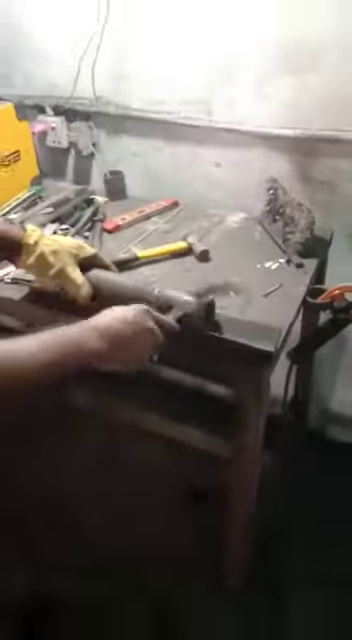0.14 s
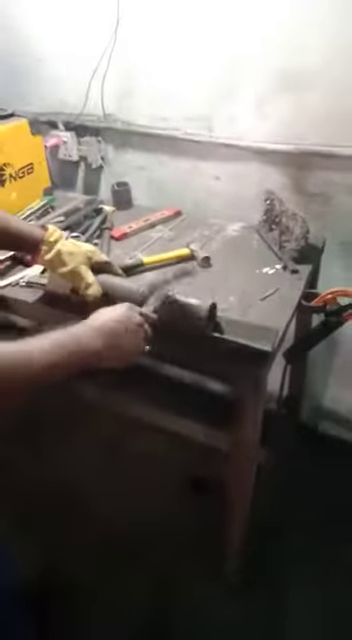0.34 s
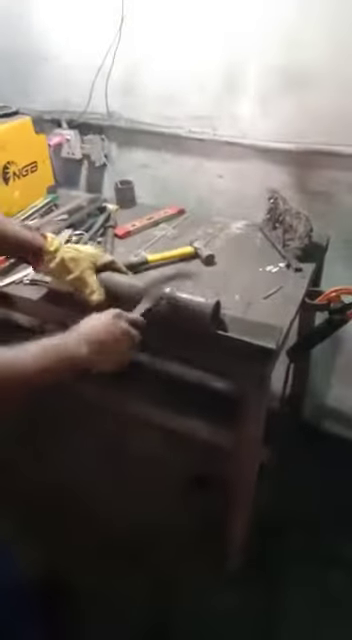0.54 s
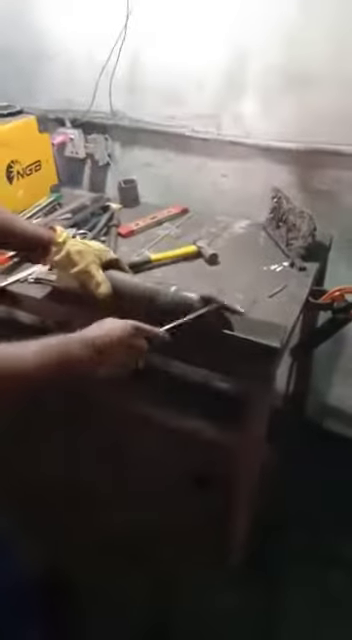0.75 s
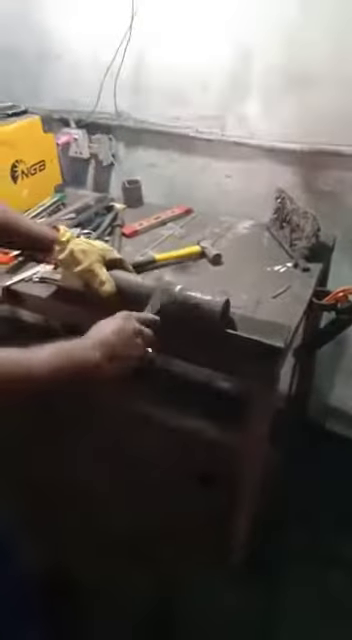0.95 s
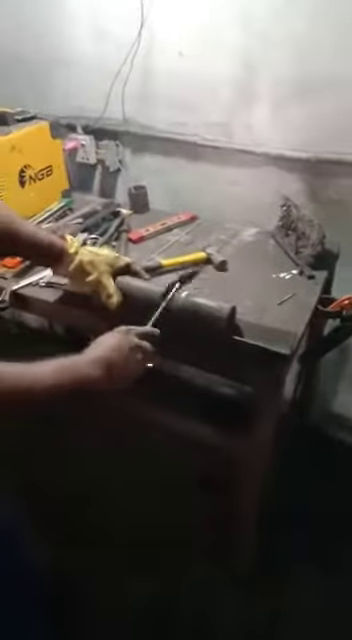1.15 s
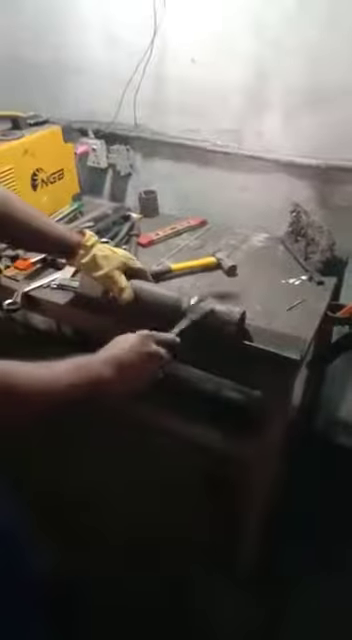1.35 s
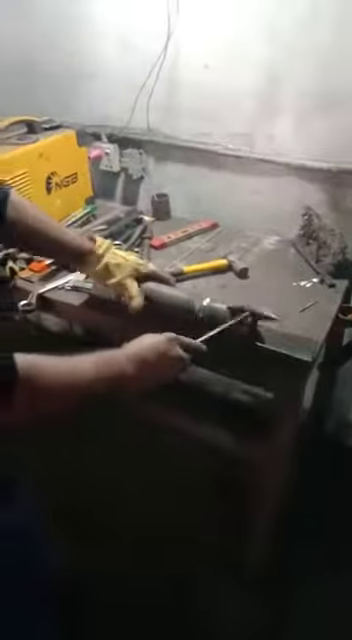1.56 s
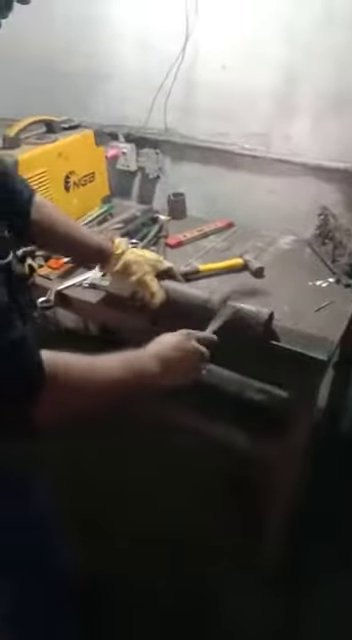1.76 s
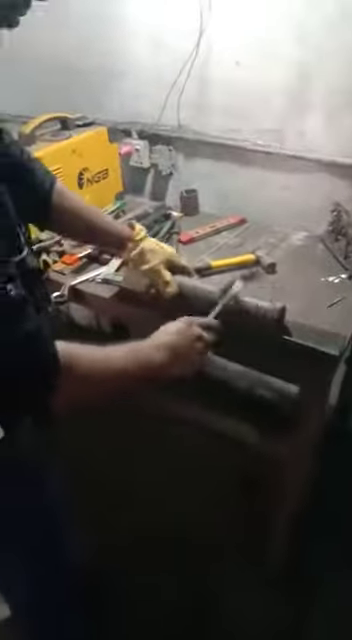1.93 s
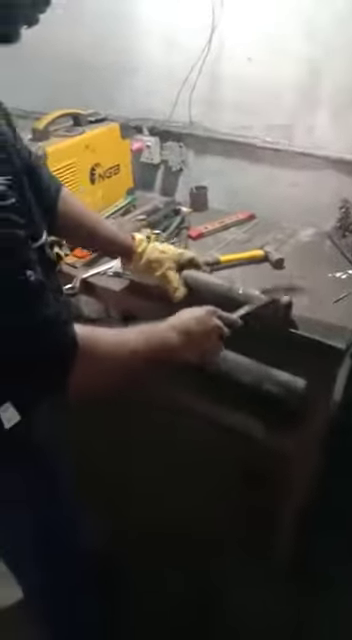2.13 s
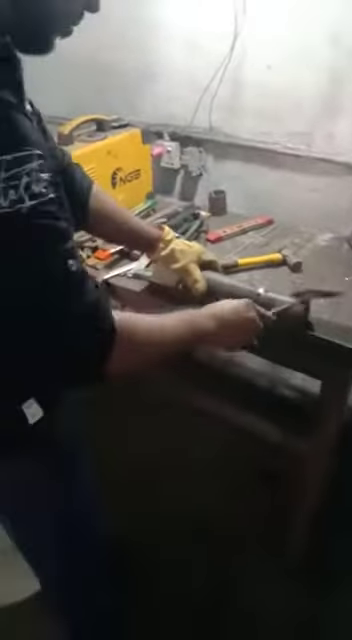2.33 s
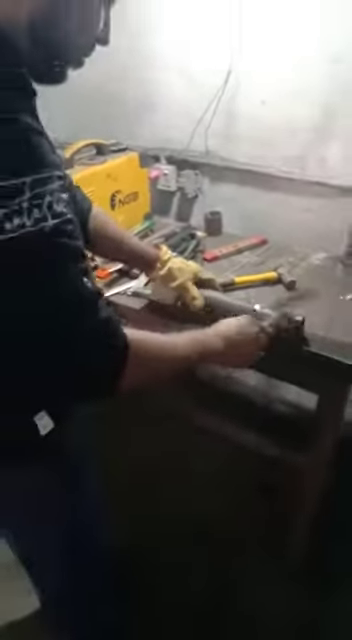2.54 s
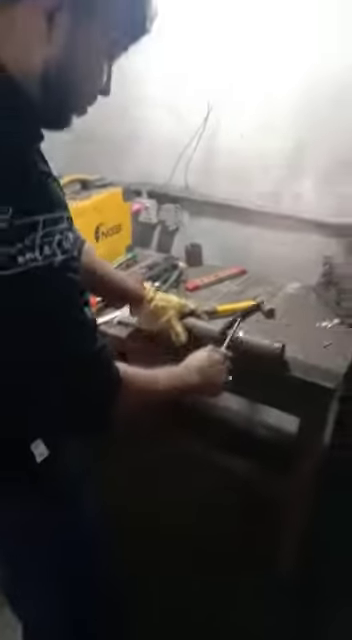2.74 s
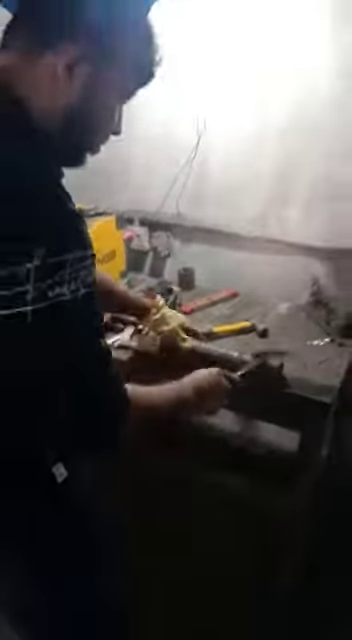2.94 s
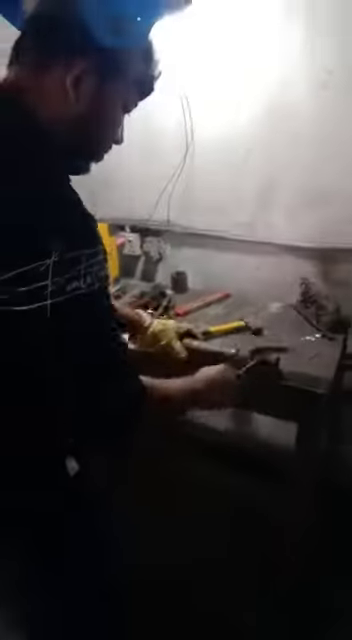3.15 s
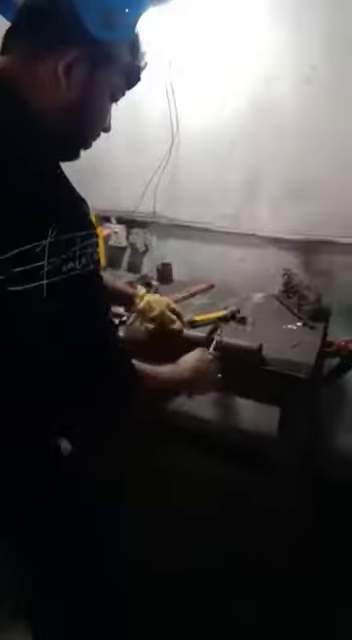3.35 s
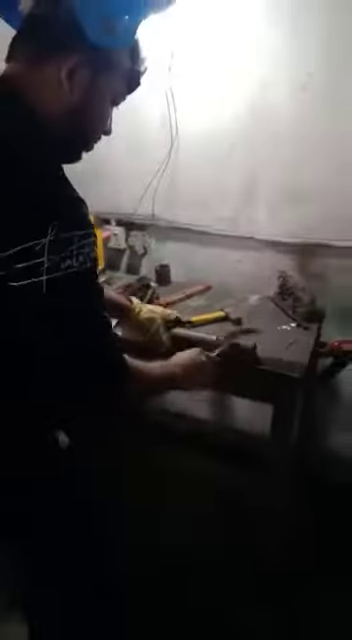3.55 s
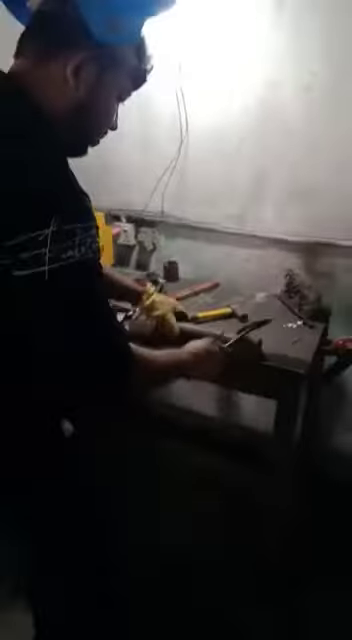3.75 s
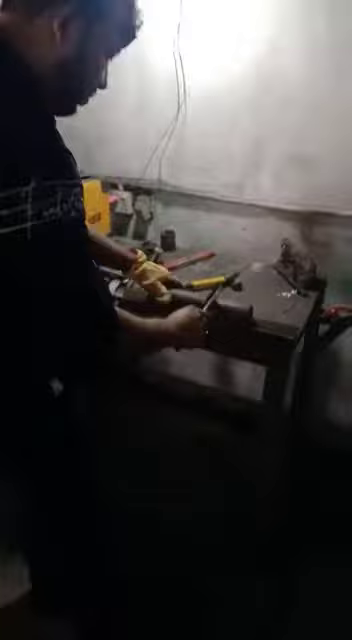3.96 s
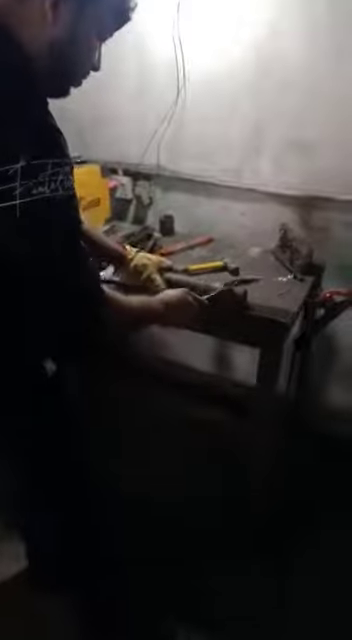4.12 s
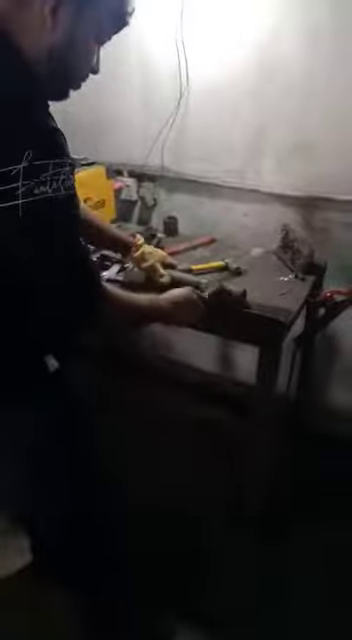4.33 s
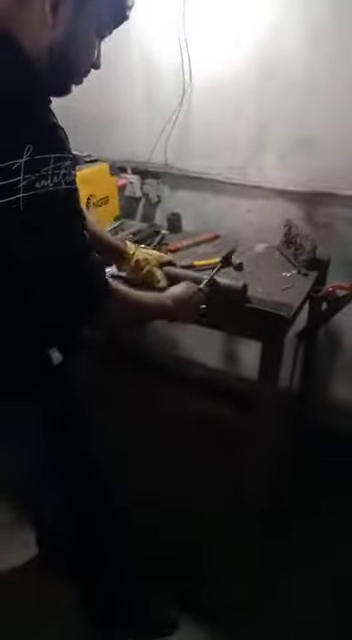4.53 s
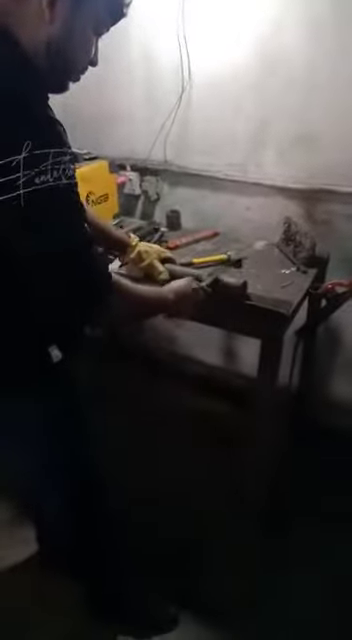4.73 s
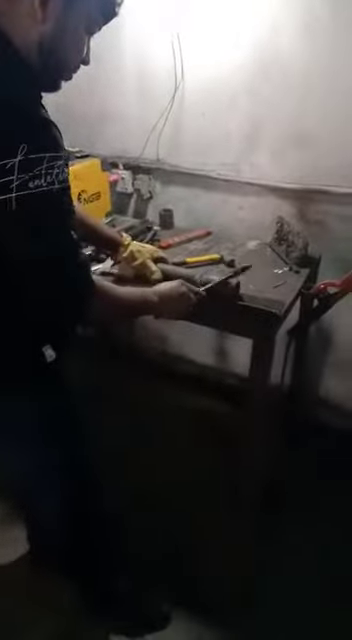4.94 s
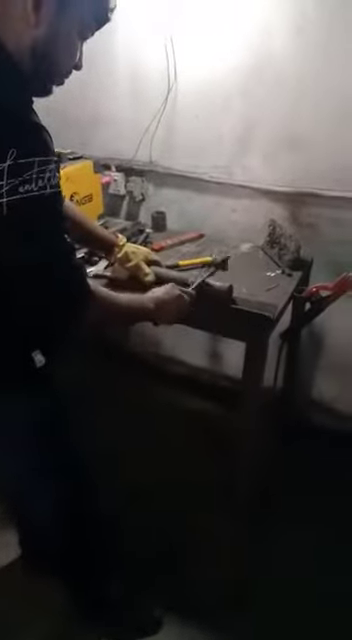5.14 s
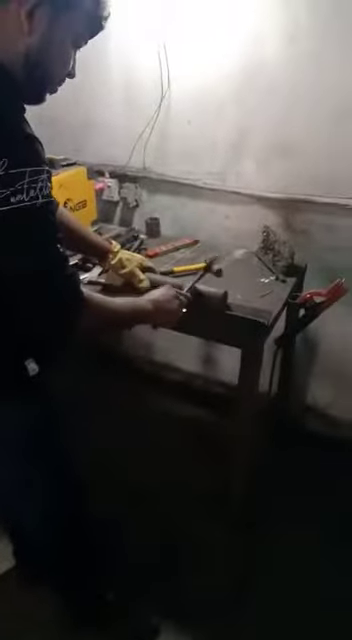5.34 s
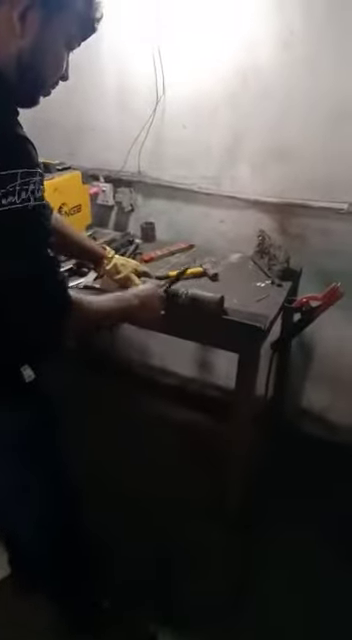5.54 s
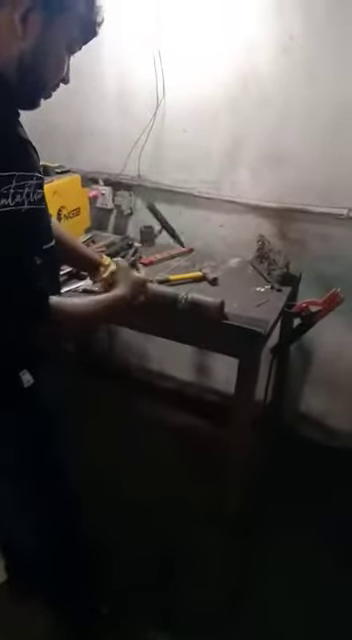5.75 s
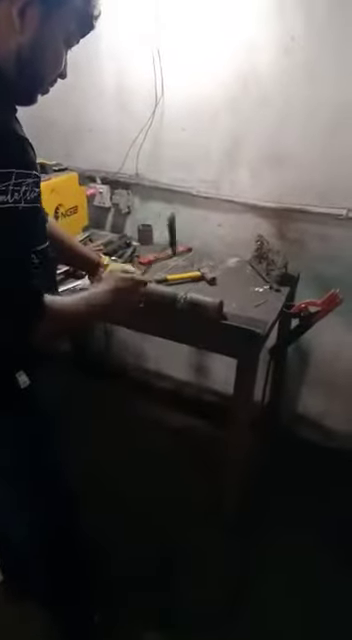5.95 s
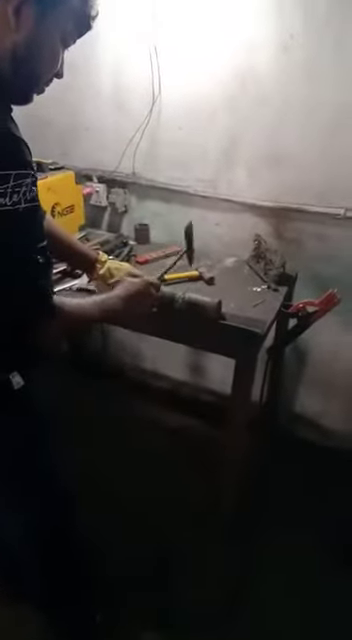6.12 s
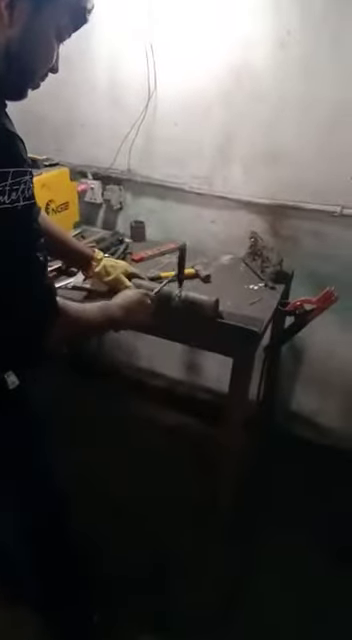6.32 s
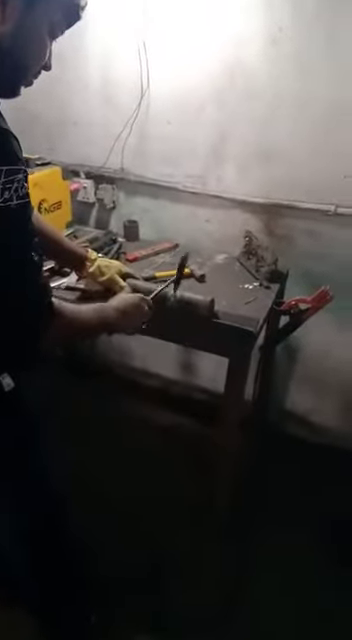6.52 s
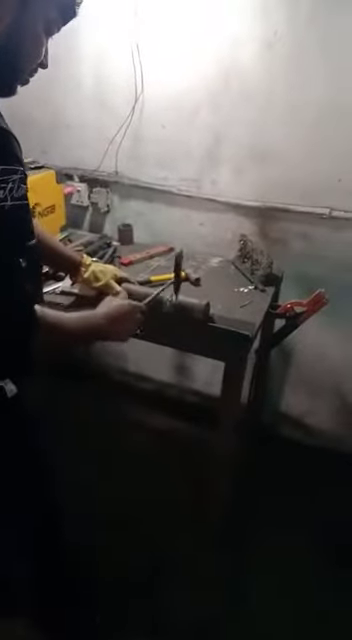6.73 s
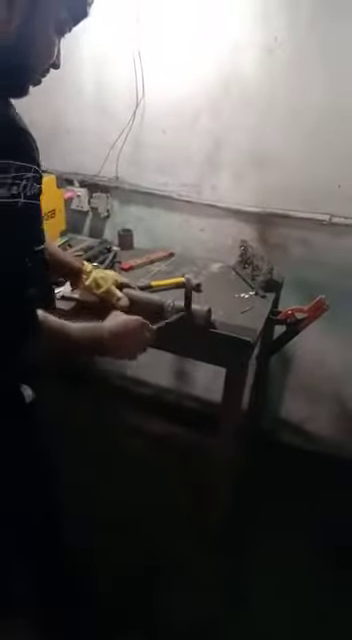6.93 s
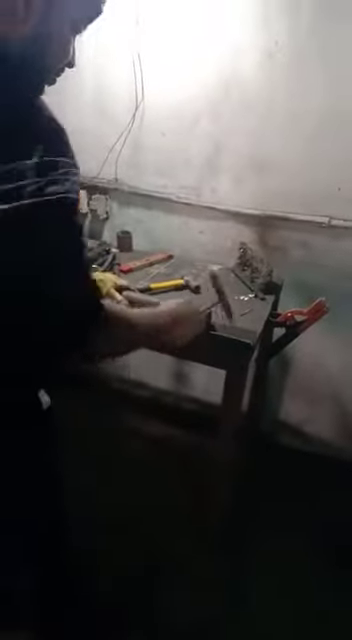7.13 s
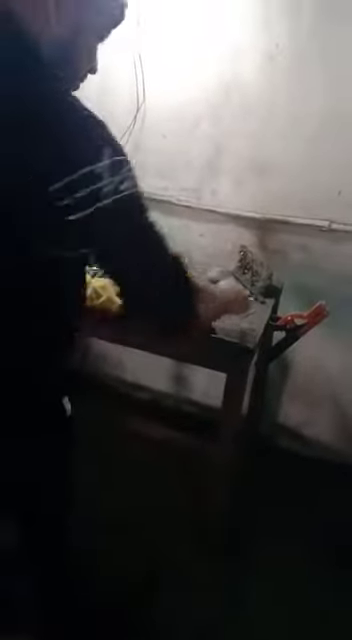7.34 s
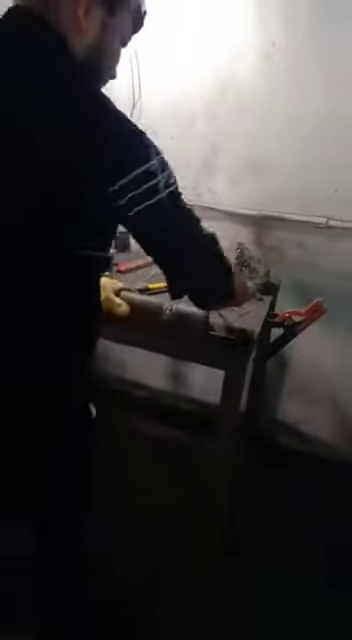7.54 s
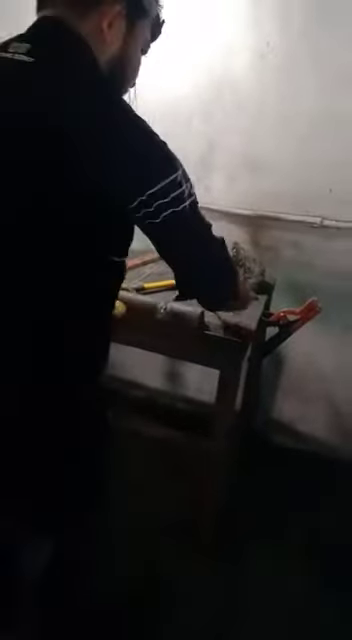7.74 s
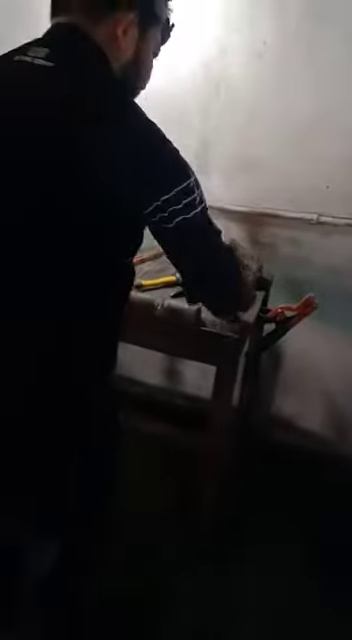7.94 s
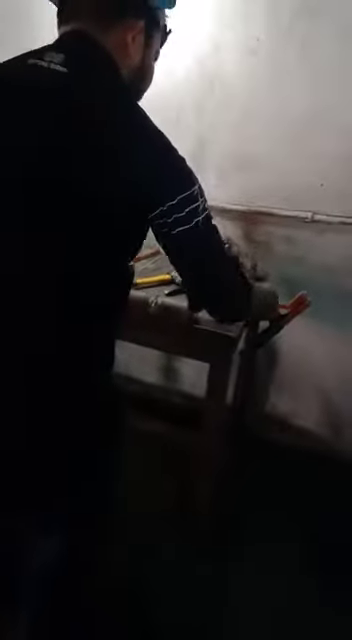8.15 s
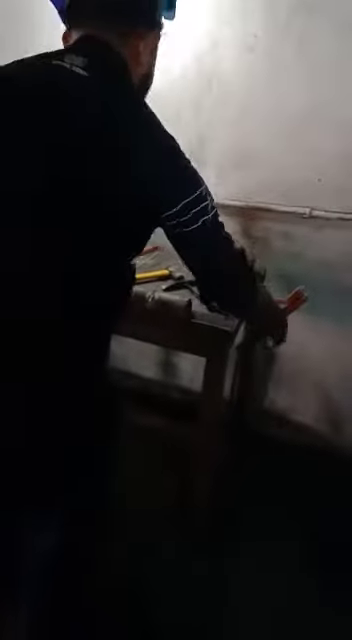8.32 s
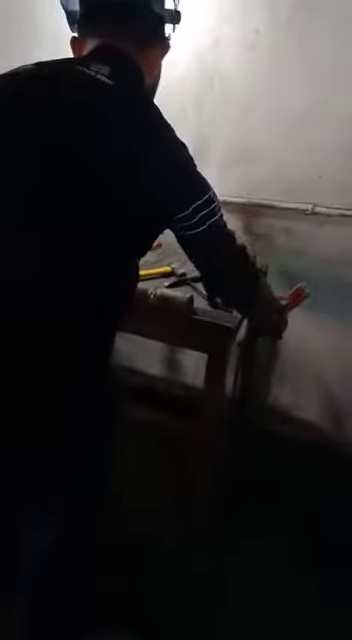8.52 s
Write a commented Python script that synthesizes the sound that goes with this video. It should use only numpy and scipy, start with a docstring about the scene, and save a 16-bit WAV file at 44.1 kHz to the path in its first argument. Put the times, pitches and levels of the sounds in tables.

```python
"""Chipping slag off a pipe weld

A chipping hammer pecks slag off the weld on a steel pipe that lies on a steel bench, in a bare workshop.
On slag a blow crunches (bursts of noise) and jolts pipe and bench; on bare steel it rings (tuned resonances).
Three later blows follow a pause, then the hammer slides across the bench and clatters down.
A phone hears it through the hard room (noise that dies away as echo), over a steady hiss."""
import sys
import numpy as np
from scipy import signal
from scipy.fft import rfft, irfft
from scipy.io import wavfile

SR = 44100
rng = np.random.default_rng(int(sys.argv[2]) if len(sys.argv) > 2 else 0)


def transcribe(u):
    """Save the signal u as a 16-bit wav file named by the first command-line argument.

    u: samples, shape (n,) or (channels, n), limited to [-1, 1]; the rate is SR.
    q: integer samples, one column per channel.
    """
    v = np.clip(np.atleast_2d(u).T, -1, 1)
    q = np.round(v * 32767).astype(np.int16)
    wavfile.write(sys.argv[1], SR, q)


N = 382788
BLOW_S = 0.05  # a burst's level is its energy spread over this time


def undb(db):
    """Turn decibels into gain."""
    return 10 ** (np.asarray(db) / 20)


def seconds(length):
    """Make a time axis in seconds."""
    return np.arange(int(length * SR)) / SR


def unit(x):
    """Scale a sound so that its energy is 1."""
    return x / np.sqrt(np.sum(x ** 2) + 1e-18)


def burst(x, db):
    """Give a short sound the energy of BLOW_S seconds at that level."""
    return unit(x) * np.sqrt(BLOW_S * SR) * undb(db)


def add(out, s, x):
    """Mix x into out from time s."""
    i = int(s * SR)
    out[i:i + len(x)] += x[:N - i]


def cut(x, hz, kind, order=2):
    """Keep the lows ("low") or the highs ("high")."""
    return signal.sosfilt(signal.butter(order, hz, kind, fs=SR, output="sos"), x)


def resonate(x, hz, width_hz):
    """Pass x through one resonance, with gain 1 at its centre."""
    return signal.lfilter(*signal.iirpeak(hz, hz / width_hz, fs=SR), x)


def resonate_twice(x, hz, width_hz):
    """Two equal resonances in a row keep less of the sound on either side."""
    return resonate(resonate(x, hz, width_hz), hz, width_hz)


def resonances(push, modes, detune=0.0053, scatter_db=4.0):
    """Drive (hz, t60_s, db) modes; grip and contact point shift each a little from blow to blow."""
    total = 0
    for hz, t60, db in modes:
        pitch_chance, level_chance = rng.standard_normal(2)
        width_hz = np.log(1000) / (np.pi * t60)  # a narrower resonance rings longer
        tone = resonate(push, hz * (1 + detune * pitch_chance), width_hz)
        total = total + burst(tone, db + scatter_db * level_chance)
    return total


def colour(x, points, size=4096):
    """Filter x through (hz, db) points, with a response that never starts before its input."""
    hz, db = np.transpose(points)
    bins_hz = np.fft.rfftfreq(size, 1 / SR)
    gain = undb(np.interp(np.log(bins_hz + 1), np.log(hz), db))
    # folding the cepstrum (the spectrum of the log gain) puts the response after time 0
    cepstrum = irfft(np.log(gain))
    cepstrum[1:size // 2] *= 2
    cepstrum[size // 2 + 1:] = 0
    response = irfft(np.exp(rfft(cepstrum)))
    return signal.fftconvolve(x, response)[:len(x)]


def fade(t, t60):
    """A smooth decay that falls 60 dB in t60 seconds."""
    return np.exp(-np.log(1000) * t / t60)


def hiss(db=-36.0):
    """Broad steady hiss: random noise with a gently shaped spectrum."""
    # colour of the hiss: pitch_hz [Hz], gain_db [dB]
    hiss_curve = [(50, 10), (200, 0), (700, 0.5), (2000, -0.5), (4500, 3), (7500, 1.5), (10000, -0.5),
                  (15000, -2.5)]
    return colour(rng.standard_normal(N), hiss_curve) * undb(db)


def contact(t, chatter, grit_db):
    """The chisel tip chatters through brittle slag: a swell of tiny uneven fractures."""
    grain = 16  # samples that share one random loudness
    loudness = undb(grit_db * rng.standard_normal(len(t) // grain + 1))
    grains = np.repeat(loudness, grain)[:len(t)]
    return t * np.exp(-t / chatter) * grains * rng.standard_normal(len(t))


def crunch(chatter, db, grit_db=2.5, tick_db=-17, tick_t60=0.004, clean_hit=0.013, top_hz=11000):
    """Slag breaks in a swell of noise; a sharp tick of steel on steel is weaker when the chatter is long."""
    t = seconds(0.15)
    tick = burst(fade(t, tick_t60) * rng.standard_normal(len(t)), db + tick_db)
    tick = tick * min(1, clean_hit / chatter) ** 2  # thick slag muffles the tick
    slag = burst(contact(t, chatter, grit_db), db)
    slag = cut(slag, top_hz, "low", order=1)
    return cut(slag + tick, 507, "high")


def ring(spot, chatter, ring_db, clank_db, build=1.18, steel_db=-3):
    """The chatter drives the steel; the strike spot sets the share of each bright mode."""
    # bright modes of pipe and hammer: pitch_hz [Hz], t60_s [s], then level_db at spots 0, 1, 2, 3 [dB]
    steel = [(2353, 0.097, -17.5, -2, -9.5, -23), (2794, 0.075, -19, -9.5, -3, -6.5),
             (2875, 0.16, -7.5, -7.5, -12, -4.5), (3003, 0.12, -19.5, -8, -20, -29),
             (3455, 0.057, -15.5, -10.5, -8, -7.5), (3620, 0.11, -9, -26, -26, -16),
             (3815, 0.12, -22, -19, -6, -15), (4370, 0.046, -34, -17, -3.5, -13),
             (4450, 0.085, -17, -19, -13, -11), (5380, 0.14, -14, -7, -23, -16),
             (5596, 0.046, -11, -9.5, -7, -10), (6350, 0.12, -87, -16, -24, -25),
             (7070, 0.098, -16, -19.5, -5.5, -22), (7130, 0.06, -20, -7.5, -10.5, -11),
             (7650, 0.17, -7, -17, -9.5, -12), (8440, 0.077, -4.5, -4.5, -0.5, -6),
             (9150, 0.075, -8.5, -12, -6, -8.5), (11650, 0.075, -3.5, -6, -0.5, -2.5),
             (12300, 0.1, -10, -15, -37, -25), (14500, 0.091, -5, -11, -14, -12),
             (15450, 0.1, -20, -20, -21, -20)]
    # lowest wall modes of the pipe, a short clank: pitch_hz [Hz], t60_s [s], level_db [dB]
    wall = [(1198, 0.056, -8.5), (1290, 0.044, -5), (1374, 0.024, -8)]
    push = contact(seconds(0.25), build * chatter, grit_db=3)
    bright = [(hz, t60, ring_db + steel_db + spot_db[spot]) for hz, t60, *spot_db in steel]
    clank = [(hz, t60, clank_db + db) for hz, t60, db in wall]
    return resonances(push, bright + clank)


def stray(chatter, ring_db, count=7, tilt_db=5.0):
    """The pipe has many more modes; each contact picks a few pings, stronger by tilt_db per octave upwards."""
    low_hz, high_hz = 3022, 14250
    t60_s, top_db = 0.078, -9.5  # top_db: level at high_hz, relative to the ring
    push = contact(seconds(0.25), chatter, grit_db=3)
    pitches = low_hz + (high_hz - low_hz) * rng.random(count)
    levels = ring_db + top_db + tilt_db * np.log2(pitches / high_hz)
    return resonances(push, [(hz, t60_s, db) for hz, db in zip(pitches, levels)])


def mode(t, hz, t60, rise, db):
    """A pure tone that builds up while the contact lasts, then dies away."""
    swell = (1 - np.exp(-t / rise)) * fade(t, t60)
    return burst(swell * np.sin(2 * np.pi * (hz * t + rng.random())), db)


def thump(chatter, db, knock_db=-2, modes_db=-29, rattle=0.0028,
          boom_hz=130, boom_width_hz=45, boom_db=-23, boom_spread=0.16):
    """The pipe jolts the bench: a dull knock drawn out by loose tools, a boom of the frame, a few low modes."""
    # modes of the bench: pitch_hz before a random shift [Hz], t60_s [s], level_db among the modes [dB]
    bench = [(103.4, 0.51, -2), (145.5, 0.89, -4), (163, 0.12, 4), (238, 0.28, 3), (293, 0.66, 1.5),
             (334.8, 0.59, -1)]
    t = seconds(0.3)
    push = contact(t, chatter + rattle, grit_db=1)
    knock = cut(burst(push, db + knock_db), 640, "low")
    hz = boom_hz * np.exp(boom_spread * rng.standard_normal())  # differs with every jolt
    boom = burst(resonate_twice(push, hz, boom_width_hz), db + boom_db)
    bench_top = 0
    for hz, t60, mode_db in bench:
        shifted_hz = hz * (1 + 0.068 * rng.standard_normal())
        bench_top = bench_top + mode(t, shifted_hz, t60, 0.0048, db + modes_db + mode_db)
    return knock + boom + bench_top


def strike(s, crunch_db, ring_db, chatter, jolts=True):
    """One contact, as (noisy part, ringing part); the pipe's clank and the bench's thump follow the crunch."""
    # the hammer works along the bead, then changes its angle: start_s [s], strike spot [0-3]
    spots = [(0, 0), (1.7, 1), (2.18, 0), (2.74, 3), (3.78, 1), (4.28, 2), (4.8, 3)]
    # how strongly a knock carries into bench and pipe wall as the work moves:
    # time_s [s], thump_db and clank_db relative to the crunch [dB]
    coupling = [(0, 3, -18.5), (1.3, 3, -13), (1.8, 3.5, -16.5), (2.8, 4.5, -12), (3.35, 2, -20),
                (3.7, 6, -16), (4.7, 3, -16.5), (5.2, 2, -6), (6.501, 0, -17), (7.65, 6, -19.5),
                (7.95, -3.5, -19.5), (8.2, 3.5, -11)]
    chatter = max(chatter, 0.0025)  # shortest chatter, s
    times, thumps, clanks = np.transpose(coupling)
    spot = [spot for start, spot in spots if start <= s][-1]
    knock, tone = np.zeros((2, SR))
    add(tone, 0, ring(spot, chatter, ring_db, crunch_db + np.interp(s, times, clanks)))
    add(tone, 0, stray(chatter, ring_db))
    add(knock, 0, crunch(chatter, crunch_db))
    if jolts:
        add(knock, 0, thump(chatter, crunch_db + np.interp(s, times, thumps)))
    return knock, tone


def split(db, bare):
    """Share a blow's energy between breaking slag and ringing steel: (crunch dB, ring dB)."""
    bare = np.clip(bare, 0.005, 0.98)  # neither part is ever quite silent
    return db + 10 * np.log10(1 - bare), db + 10 * np.log10(bare)


def hammering():
    """Full blows and glancing touches along the weld, as (noisy part, ringing part)."""
    # full blows: start_s [s], strength_db to be shared [dB], share on bare steel [0-1],
    # chatter_s of the contact, before the shortest chatter is applied [s]
    blows = [(0.002, -15.5, 0.25, 0.0021), (0.093, -18.5, 0.13, 0.0038), (0.226, -15.5, 0.14, 0.0068),
             (0.355, -16.5, 0.41, 0.0078), (0.484, -18.5, 0.36, 0.0061), (0.524, -12, 0.85, 0.009),
             (0.677, -14.5, 0.57, 0.013), (0.828, -12.5, 0.5, 0.0083), (0.969, -17.5, 0.5, 0.011),
             (1.086, -14.5, 0.68, 0.015), (1.225, -16, 0.46, 0.007), (1.361, -16, 0.47, .0085),
             (1.481, -16.5, 0.57, 0.009), (1.6, -15.5, 0.57, 0.021), (1.75, -14.5, 0.66, 0.0059),
             (1.815, -18, .05, 0.011), (1.892, -12.5, 0.01, 0.0053), (1.981, -22, 0.7, 0.002),
             (2.013, -15.5, 0.52, 0.014), (2.152, -18, 0.17, 0.0046), (2.207, -19.5, 0, .0025),
             (2.259, -16, .36, 0.0046), (2.405, -13.5, 0, 0.0058), (2.523, -16, 0.5, 0.0058),
             (2.665, -14, 0, 0.0072), (2.777, -14, 0.06, 0.011), (2.906, -14.5, 0, 0.0055),
             (2.961, -15.5, 0.56, 0.0072), (3.107, -13, 0.94, 0.0052), (3.248, -15, 0.7, 0.0082),
             (3.386, -15.5, 0.82, 0.011), (3.665, -16.5, 0, 0.0099), (3.705, -16.5, 0, 0.006),
             (3.886, -14.5, 0.4, 0.013), (4.02, -19, 0.65, 0.011), (4.156, -17, 0.7, .013),
             (4.343, -18.5, 0.57, 0.014), (4.472, -14, 0.39, 0.01), (4.58, -19, 0.1, 0.046),
             (4.715, -18, 0.41, 0.0066), (4.848, -14.5, 0.62, 0.018), (5.011, -14, 0.09, .003),
             (5.1, -26.5, 0.1, 0.0076), (5.225, -16, .39, .004), (5.303, -18, 0.38, 0.0019),
             (5.435, -26.5, 0.8, 0.0054), (6.257, -14, 0.02, 0.0043), (6.477, -12.5, 0.08, 0.0016),
             (6.555, -21, 0.24, 0.0081)]
    # glancing touches of the tip, too light to jolt the bench:
    # start_s [s], strength_db to be shared [dB], share on bare steel [0-1]
    glances = [(0.254, -16.5, 0.6), (0.511, -16.5, 0.17), (0.808, -19.5, 0.8), (1.251, -15.5, 0.92),
               (3.544, -19.5, 0.57), (3.572, -16.5, 0.65), (3.828, -20, 0), (4.311, -16.5, 0.91),
               (4.754, -17.5, 0.23)]
    glance_chatter_s = 0.0031
    knocks, rings = np.zeros(N), np.zeros(N)
    contacts = [(s, strike(s, *split(db, bare), chatter)) for s, db, bare, chatter in blows]
    for s, db, bare in glances:
        contacts.append((s, strike(s, *split(db, bare), glance_chatter_s, jolts=False)))
    for s, (knock, tone) in contacts:
        add(knocks, s, knock)
        add(rings, s, tone)
    return knocks, rings


def scrapes(grit_db=4):
    """Uneven slips feed a resonance while the steel slides on the bench."""
    # slides: start_s [s], length_s [s], centre_hz [Hz],
    # width_hz, half that of each resonance [Hz], level_db over the length [dB]
    slides = [(7.081, 0.033, 805, 88.5, -36.5), (7.09, 0.11, 390, 129, -42),
              (7.079, 0.12, 1675, 1790, -38.5), (7.451, 0.033, 824, 60, -36.5),
              (7.454, 0.02, 1160, 110, -38), (8.658, 0.05, 1040, 199, -32)]
    out = np.zeros(N)
    for s, length, hz, width_hz, db in slides:
        slips = contact(seconds(0.9), length / 4, grit_db)
        scrape = burst(resonate_twice(slips, hz, 2 * width_hz), db)
        add(out, s, scrape * np.sqrt(length / BLOW_S))  # a longer slide carries more energy
    return out


def laying_down():
    """The hammer tumbles on the gritty bench and, as the grip lets go, rings with its own modes too."""
    # tumbles: start_s [s], strength_db [dB], chatter_s before the shortest chatter is applied [s],
    # how freely the hammer rings [0-1]
    clatter = [(7.529, -11, 0.003, 0.07), (7.601, -19, 0.013, 0), (7.685, -17.5, 0.014, 0.16),
               (7.951, -15.5, 0.0039, 0.78), (8.033, -18.5, 0.0032, 0.77), (8.107, -17, 0.0041, 0.38),
               (8.155, -24, 0.015, 1), (8.238, -26.5, 0.0056, 1)]
    # modes of the loose hammer: pitch_hz [Hz], t60_s [s], level_db relative to the knock [dB]
    loose_hammer = [(336.6, 0.54, -11), (1770, .015, -10), (2114, .03, -10)]
    pipe_ring_db = -15  # bright ring of the pipe, relative to the knock
    knocks, rings = np.zeros(N), np.zeros(N)
    for s, db, chatter, free in clatter:
        knock, tone = strike(s, db, db + pipe_ring_db, chatter)
        push = contact(seconds(0.6), chatter, grit_db=3)
        own_modes = [(hz, t60, db + mode_db) for hz, t60, mode_db in loose_hammer]
        add(knocks, s, knock)
        add(rings, s, tone)
        add(rings, s, free * resonances(push, own_modes))
    return knocks, rings


def reflections(x, t60, count=12):
    """The dense rush from bench and corner; its pattern changes as the hand-held phone moves."""
    t = seconds(0.4)
    step = N // count  # each stretch of sound gets its own echo pattern
    out = np.zeros(N)
    for start in range(0, N, step):
        echoes = rng.standard_normal(len(t)) * fade(t, t60) * (1 - np.exp(-t / 0.0027))
        add(out, start / SR, signal.fftconvolve(x[start:start + step], unit(echoes)))
    return out


def workshop(x, direct_db, early_db, late_db, early_t60=0.23, late_t60=1.196, treble_t60=0.42):
    """Direct sound, early reflections, then the tail of the whole room, whose treble dies sooner."""
    t = seconds(1.5)
    far = rng.standard_normal(len(t))
    body = cut(far, 7000, "low", order=1) * fade(t, late_t60)
    treble = cut(far, 3500, "high", order=1) * fade(t, treble_t60)
    late = (body + treble) * (1 - np.exp(-t / 0.015))  # the tail builds up softly
    tail = signal.fftconvolve(x, unit(late))[:N]
    return undb(direct_db) * x + undb(early_db) * reflections(x, early_t60) + undb(late_db) * tail


def scene():
    """Put hammering, sliding and clatter in the room, and add the hiss."""
    knocks, rings = np.add(hammering(), laying_down())
    noisy = workshop(knocks + scrapes(), direct_db=-7.5, early_db=-3.5, late_db=-5.0)
    tonal = workshop(rings, direct_db=-4.0, early_db=-12.0, late_db=-8.5)
    return (noisy + tonal + hiss())[None]


def record(dry, drive=1.85):
    """The phone's microphone: its colour and honk, rounded peaks, and the top cut."""
    # colour of the microphone before the honk and top cut: pitch_hz [Hz], gain_db [dB]
    mic_curve = [(30, -41), (62, -16), (115, -6.5), (330, -1.5), (410, -1.5), (1000, -1.5), (1700, -2),
                 (2200, -0.5), (5000, -2.5), (6200, 3.5), (6600, -3.5), (7300, 4.5), (8000, -5),
                 (10000, -24.5), (13500, -32), (15200, -14.5)]
    honk_hz, honk_width_hz, honk_db = 1257, 80, 6.5
    x = colour(dry[0], mic_curve)
    x = x + undb(honk_db) * resonate(x, honk_hz, honk_width_hz)
    x = np.tanh(drive * x) / drive
    top_cut = signal.ellip(10, 0.2, 70, 15600, fs=SR, output="sos")  # steep low-pass at 15600 Hz
    return signal.sosfilt(top_cut, x)[None]


dry = scene()
out = record(dry)
transcribe(out)
```